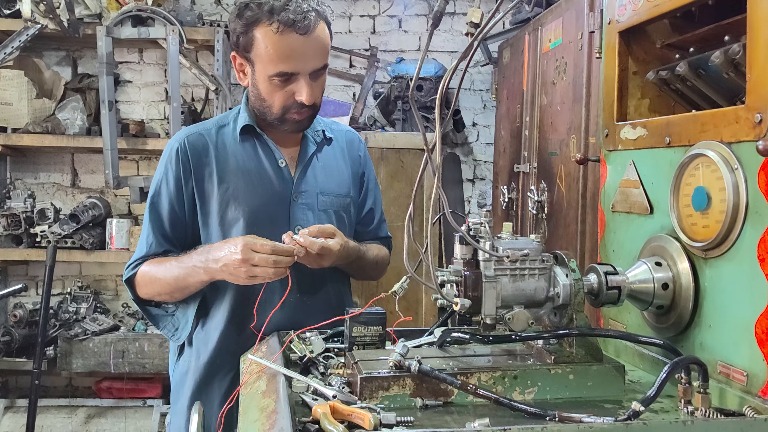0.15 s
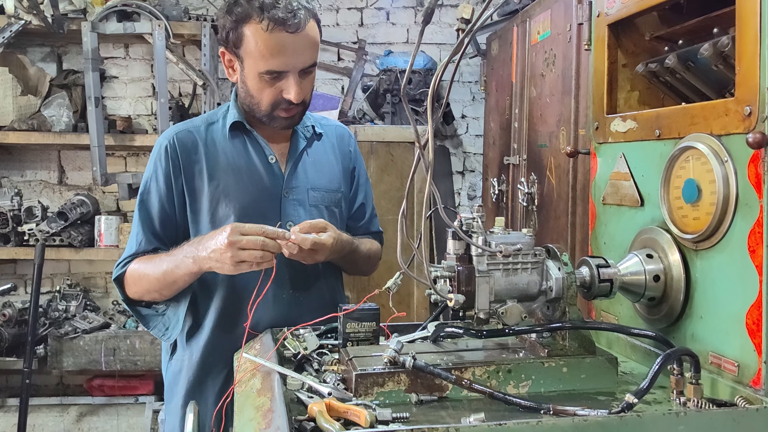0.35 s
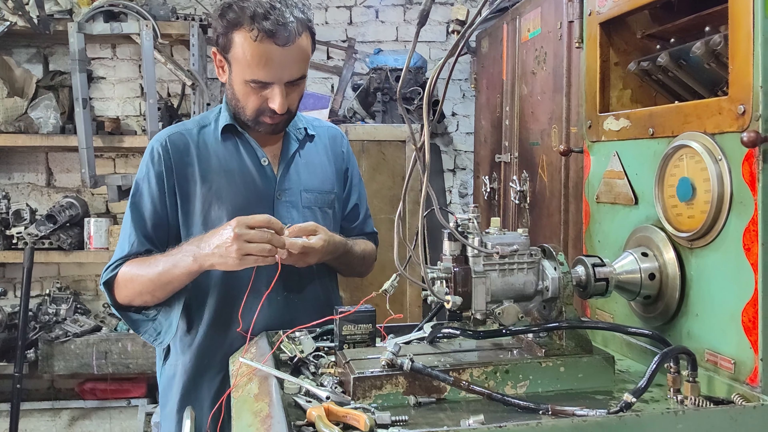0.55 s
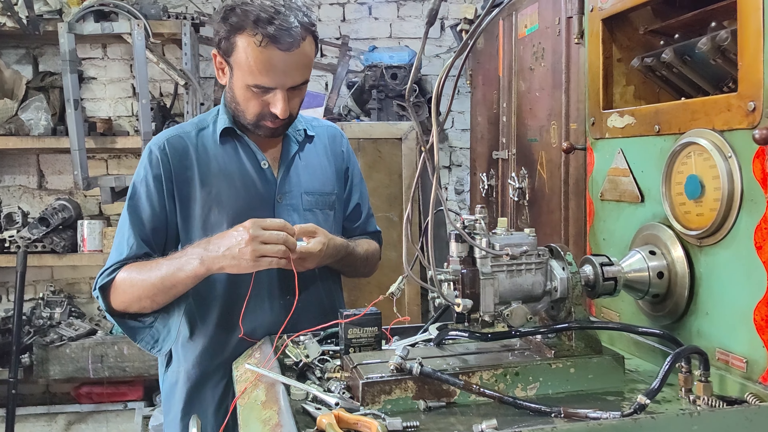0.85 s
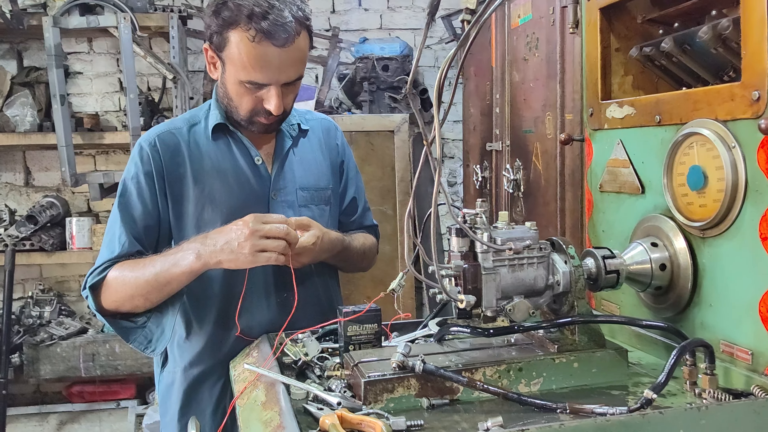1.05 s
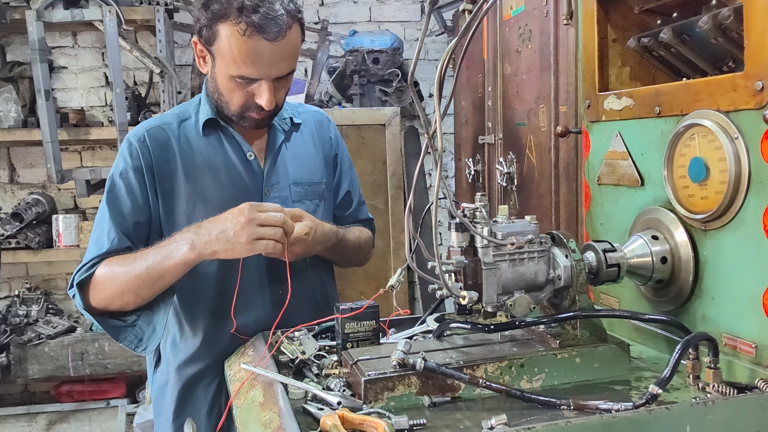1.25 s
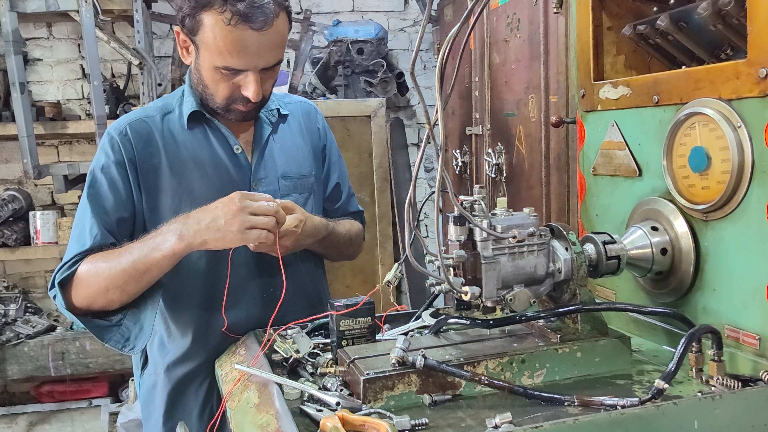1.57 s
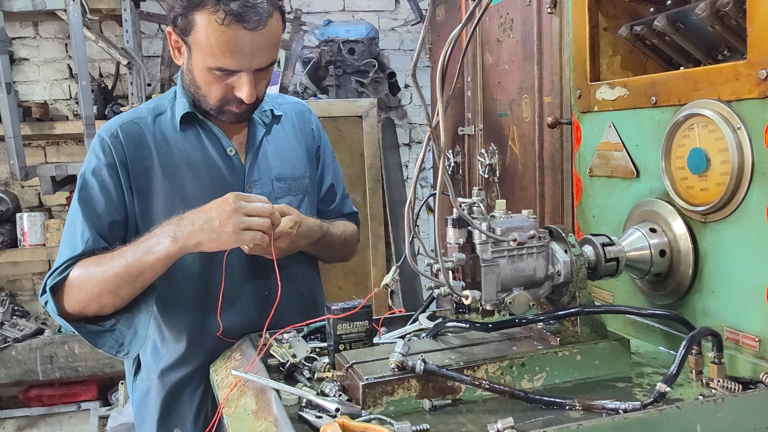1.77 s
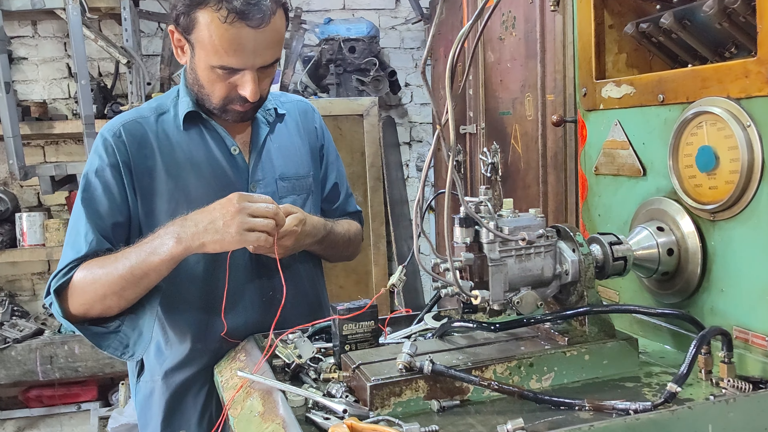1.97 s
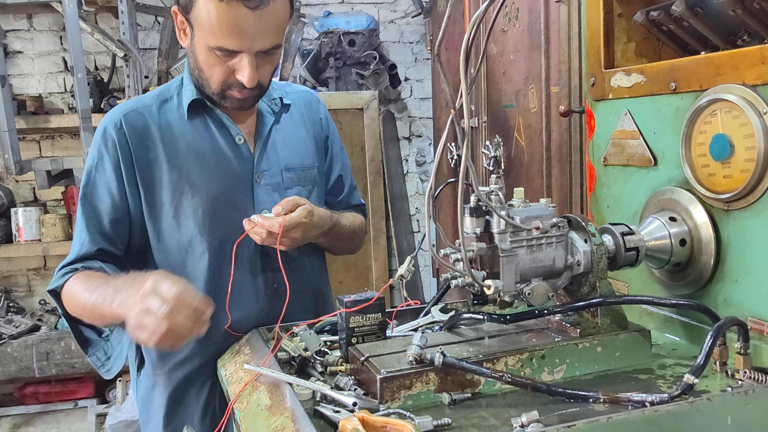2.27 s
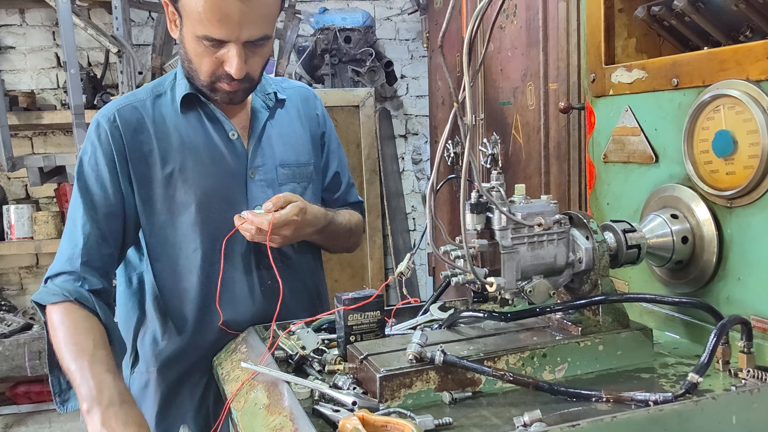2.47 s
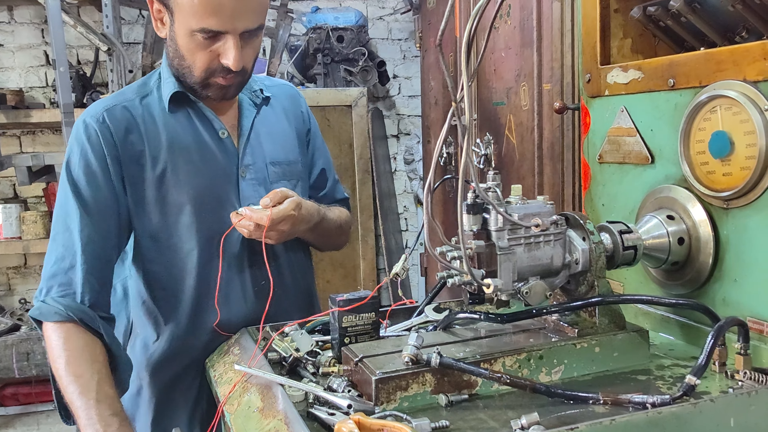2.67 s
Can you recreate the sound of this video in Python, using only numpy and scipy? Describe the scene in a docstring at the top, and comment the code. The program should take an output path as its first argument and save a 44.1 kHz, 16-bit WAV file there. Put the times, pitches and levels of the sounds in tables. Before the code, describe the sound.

A motor-driven test bench runs a fuel injection pump, clattering steadily over a low electric hum

```python
"""In a small workshop, a motor-driven test bench turns a diesel injection pump at a steady speed.
The pump clatters through its metal body (uneven knocks and noise into resonances) and chuffs once a turn.
Wavering sines make the gear lines, the motor hum and the frame's drone on multiples of the shaft rate.
A steel part rings now and then and the frame booms dully; both are short swells of wandering tones.
On the left, a thin noise hiss pulses with the shaft; a broader hiss dies away early."""
import sys
import numpy as np
from scipy import signal
from scipy.fft import rfft, irfft, next_fast_len
from scipy.io import wavfile
from scipy.ndimage import uniform_filter1d, map_coordinates

SR = 44100
rng = np.random.default_rng(int(sys.argv[2]) if len(sys.argv) > 2 else 0)


def waveform_to_disk(signal):
    """Save audio, clipped to [-1, 1], as 16-bit WAV at the path in sys.argv[1]."""
    frames = np.transpose(np.atleast_2d(signal))
    scaled = np.clip(frames, -1, 1) * 32767
    samples = np.round(scaled).astype(np.int16)
    wavfile.write(sys.argv[1], SR, samples)


N = 124362

SHAFT_HZ = 12.302
SWELL_TURN = 0.48


def amp(db):
    """Decibels to gain."""
    return 10 ** (np.asarray(db) / 20)


def unit(x):
    """Scale to rms 1."""
    return x / np.sqrt(np.mean(x ** 2) + 1e-20)


def clock():
    """The time of every sample [s]."""
    return np.arange(N) / SR


def along(points, hz):
    """Interpolate (Hz, value) points on a log axis."""
    f, v = np.transpose(points)
    return np.interp(np.log(hz + 1), np.log(f + 1), v)


def curve(rows):
    """(s, value) points joined by lines."""
    return np.interp(clock(), *np.transpose(rows))


def wobble(rate_hz):
    """A smooth random curve, rate_hz knots a second."""
    knots = rng.standard_normal(int(N * rate_hz / SR) + 4)
    return map_coordinates(knots, [clock() * rate_hz])


def filtered(x, response):
    """x times a response of frequency, zero-padded."""
    size = next_fast_len(N + SR // 2)
    hz = np.fft.rfftfreq(size, 1 / SR)
    return irfft(rfft(x, size) * response(hz), size)[..., :N]


def coloured(x, spectrum):
    """x shaped by the given spectrum, at rms 1."""
    return unit(filtered(x, lambda hz: amp(along(spectrum, hz))))


# left-right correlation: (frequency [Hz], correlation [0-1])
CORRELATION = [(30, 0.64), (70, 1), (150, 1), (400, 0.96), (800, 0.93), (1300, 0.5), (2500, 0.29),
               (5000, 0.042)]


def spread(pair):
    """Two signals become left and right at rms 1: alike in the bass, apart in the treble."""
    def mid_side_gains(hz):
        angle = np.arccos(np.clip(along(CORRELATION, hz), -1, 1)) / 2
        return np.array([np.cos(angle), np.sin(angle)])
    mid, side = filtered(pair, mid_side_gains)
    return unit(np.array([mid + side, mid - side]))


def noise():
    """Two channels of white noise."""
    return rng.standard_normal((2, N))


def tone(hz, waver_rad, rate_hz=5):
    """A sine of about rms 1 whose phase wanders."""
    start_turn = rng.random()
    return np.sqrt(2) * np.sin(2 * np.pi * (hz * clock() + start_turn) + waver_rad * wobble(rate_hz))


def bump(s, length_s):
    """A soft Gaussian swell around time s."""
    return np.exp(-(2 * (clock() - s) / length_s) ** 2)


def swell(count=1, turn=SWELL_TURN):
    """A cosine of count cycles a turn, peaking at the given place in the turn."""
    return np.cos(2 * np.pi * count * (SHAFT_HZ * clock() - turn))


PATCHY_DB = 3


def patchy(x):
    """Neighbouring bands swell and sink by chance; rms 1."""
    z = signal.stft(x, nperseg=512)[2]
    field = rng.standard_normal(z.shape[1:])
    field = uniform_filter1d(field, size=3, axis=0)
    field = uniform_filter1d(field, size=5, axis=1)
    return unit(signal.istft(z * amp(PATCHY_DB * unit(field)), nperseg=512)[1][:, :N])


ROOM_T60_S, ROOM_DB = 0.12, 3


def workshop(x):
    """Direct sound plus a short diffuse decaying tail, as middle and side."""
    t = np.arange(SR // 3) / SR
    tail = rng.standard_normal((2, len(t))) * amp(-60 * t / ROOM_T60_S)
    tail /= np.linalg.norm(tail, axis=1, keepdims=True)
    middle, side = signal.fftconvolve(x[None], tail, axes=1)[:, :N]
    return np.array([unit(x + amp(ROOM_DB) * middle), unit(side)])


KNOCK_JITTER_S, KNOCK_SCATTER_DB, KNOCK_PATTERN_DB = .00022, 2.2, 1.3


def knocks(count):
    """The same uneven contacts come round every turn, never quite alike."""
    turns = np.arange(int(N / SR * SHAFT_HZ) + 1)[:, None]
    place = (np.arange(count) + rng.random(count)) / count
    jitter_s = KNOCK_JITTER_S * rng.standard_normal((len(turns), count))
    s = (turns + place) / SHAFT_HZ + jitter_s
    pattern_db = KNOCK_PATTERN_DB * rng.standard_normal(count)
    size = amp(pattern_db + KNOCK_SCATTER_DB * rng.standard_normal(s.shape))
    return np.bincount(np.abs(s * SR).astype(int).ravel(), size.ravel(), N)[:N]


# pump body spectrum, with a faint separate band of hiss near 14-15 kHz: (frequency [Hz], relative density [dB])
BODY_SPECTRUM = [(250, -26), (480, -11.5), (660, -12.5), (780, -3), (880, 0), (990, -4), (1120, 0),
                 (1220, 0.5), (1330, -1), (1570, -1.5), (1710, -2), (1810, -7), (2120, 2), (2270, -5),
                 (2500, -2), (2660, -7), (2980, -8), (3250, -17.5), (3600, -15.5), (3950, -26),
                 (4280, -28.5), (4750, -20), (5500, -29.5), (6500, -35), (7700, -50), (13700, -54),
                 (14700, -51)]
# housing and bench resonances: (frequency [Hz], width [Hz], relative gain [dB])
HOUSING_MODES = [(904, 55, -1), (1055, 48, 2), (1111, 32, 2.5), (1420, 16, 6.5), (1522, 28, 4),
                 (1738, 55, 4), (1905, 32, 1), (2053, 29, 5), (2478, 58, -1)]
# drive noise level, used about its mean: (time [s], level [dB])
DRIVE_LOAD = [(0.2, -34), (0.45, -36.5), (0.56, -36), (0.69, -36.5), (0.77, -36.5), (1.1, -37.5),
              (1.4, -36), (1.9, -36.5), (2.3, -35.5), (2.59, -35), (2.77, -36.5)]
CLATTER_DB, HOUSING_DB, WHIRR_DB = -40, -41.5, -44
HOUSING_WAVER_DB, CLATTER_SWELL_DB = 5, -0.25


def drive():
    """Gear and tappet knocks and bearing whirr excite the pump body; each resonance swells in its own way."""
    blows = workshop(knocks(count=24))
    push = unit(blows) + noise()
    ringing = 0
    for k, (centre_hz, width_hz, db) in enumerate(HOUSING_MODES):
        def resonance(f):
            damping = 1j * f * width_hz
            return (-1) ** k * damping / (centre_hz ** 2 - f * f + damping)
        ringing = ringing + amp(db + HOUSING_WAVER_DB * wobble(28.2)) * filtered(push, resonance)
    parts = ((CLATTER_DB, patchy(blows)), (HOUSING_DB, ringing), (WHIRR_DB, patchy(noise())))
    body = sum(amp(db) * spread(coloured(part, BODY_SPECTRUM)) for db, part in parts)
    load_db = curve(DRIVE_LOAD)
    return amp(load_db - load_db.mean() + CLATTER_SWELL_DB * swell()) * body


# stroke noise spectrum: (frequency [Hz], relative density [dB])
PUFF_SPECTRUM = [(400, -24), (850, 0), (1250, 2), (1650, 3), (2000, -2.5), (2400, -3), (2800, -4),
                 (3100, -11), (3600, -17.5), (4100, -36), (8000, -48.5)]
# harder, scraping strokes: (time [s], length [s], level [dB])
SCRAPE_STROKES = [(.208, 0.038, -34.5), (.603, 0.031, -41.5), (1.509, .02, -41.5), (2.232, .02, -40),
                  (2.316, 0.024, -40), (2.648, 0.046, -34.5), (2.715, 0.026, -40), (2.799, 0.018, -40)]
STROKE_TURN, STROKE_S, STROKE_HZ, STROKE_SCATTER_HZ = .42, .022, 1310, 18
STROKE_DB, STROKE_SCATTER_DB, PUFF_DB = -46.3, 1, -42.5


def strokes():
    """Once a turn a short housing ring sounds inside a puff of noise; some strokes scrape harder."""
    times = (np.arange(int(N / SR * SHAFT_HZ) + 1) + STROKE_TURN) / SHAFT_HZ
    size, detune = rng.standard_normal((2, len(times)))
    beats = [amp(STROKE_SCATTER_DB * z) * bump(s, STROKE_S) for s, z in zip(times, size)]
    pitches_hz = STROKE_HZ + STROKE_SCATTER_HZ * detune

    def ring():
        return sum(beat * np.sin(2 * np.pi * (hz * clock() + rng.random()))
                   for beat, hz in zip(beats, pitches_hz))
    rings = np.array([ring() for _ in range(2)])
    scrapes = sum(amp(db) * bump(s, length_s) for s, length_s, db in SCRAPE_STROKES)
    puff = amp(PUFF_DB) * sum(beats) + scrapes
    return amp(STROKE_DB) * spread(rings) + puff * spread(coloured(patchy(noise()), PUFF_SPECTRUM))


# gear lines: {multiple of shaft rate: level [dB]}
GEAR_LINES = {73: -48.5, 86: -53.5, 89: -52.5, 90: -56, 96: -60.5, 105: -58, 124: -56, 139: -60, 168: -56}
GEAR_WAVER_DB, GEAR_WAVER_RAD = 3, .55


def gears():
    """Gear lines at shaft-rate multiples waver in level and phase."""
    def line(hz):
        level = amp(GEAR_WAVER_DB * wobble(14))
        return level * np.array([tone(hz, GEAR_WAVER_RAD, rate_hz=16) for _ in range(2)])
    return sum(amp(db) * spread(line(k * SHAFT_HZ)) for k, db in GEAR_LINES.items())


# frame drone: {multiple of shaft rate: level [dB]}
FRAME_ORDERS = {4: -56, 5: -39, 6: -52, 7: -59, 9: -60, 11: -63, 14: -52, 16: -48.5, 17: -53, 20: -47.5, 21:
                -51, 22: -58.5, 23: -57, 32: -61.5, 34: -55, 35: -65, 38: -66.5}
# rumble spectrum: (frequency [Hz], relative density [dB])
RUMBLE_SPECTRUM = [(20, -19), (32, -2), (50, -3.5), (80, -1.5), (125, 1.5), (190, -3), (270, -5.5),
                   (310, -9), (360, -4), (425, -11.5), (470, -17), (650, -19.5), (1200, -52), (4000, -100)]
# deep drone, before mean removal and DEEP_SHARE: (time [s], level [dB])
DEEP_LEVEL = [(0.4, -29), (0.68, -36), (0.7, -36), (1.01, -45), (1.17, -31.5), (1.27, -44), (2.16, -38),
              (2.2, -38), (2.23, -36), (2.63, -43), (2.75, -33), (2.8, -51)]
# throb above it, before mean removal and THROB_SHARE: (time [s], level [dB])
THROB_LEVEL = [(0.2, -40), (0.35, -44), (0.41, -41.5), (0.68, -40), (.93, -42), (1.15, -40.5), (1.8, -41.5),
               (2.11, -37), (2.14, -42), (2.18, -40), (2.3, -36), (2.4, -44.5), (2.52, -42.5), (2.8, -39.5)]
DEEP_SHARE, THROB_SHARE = 0.4, 0.57
MAINS_HUM_HZ, HUM_DB, HUM_WAVER_DB = 99.8, -35, 0.4
MOTOR_HZ, MOTOR_DB = 44.6, -49.5
DRONE_WAVER_DB, DRONE_WAVER_RAD, DRONE_SIDE_DB = 3, 0.21, -23
RUMBLE_DB, RUMBLE_WAVER_DB = -41, 1.7
THROB_TURN, THROB_SWELL_DB = 0.095, 1.5


def drone():
    """Motor hum, the frame's shaft orders and the rumble between them, throbbing twice a turn."""
    def swing(rows, share):
        level_db = curve(rows)
        return share * (level_db - level_db.mean())
    deep_db, throb_db = swing(DEEP_LEVEL, DEEP_SHARE), swing(THROB_LEVEL, THROB_SHARE)

    def order(k, db):
        hz = k * SHAFT_HZ
        swing_db = deep_db if hz < 100 else throb_db if hz < 500 else 0
        return amp(db + swing_db + DRONE_WAVER_DB * wobble(5.01)) * tone(hz, DRONE_WAVER_RAD)
    hum = amp(HUM_DB + HUM_WAVER_DB * wobble(7.45)) * tone(MAINS_HUM_HZ, 0.063)
    hum = hum + amp(MOTOR_DB + deep_db) * tone(MOTOR_HZ, .2)
    frame = sum(order(k, db) for k, db in FRAME_ORDERS.items())
    # quadrature copy, opposite in the two channels
    side = amp(DRONE_SIDE_DB) * signal.hilbert(hum + frame).imag * wobble(6.12)
    twice_a_turn_db = THROB_SWELL_DB * swell(count=2, turn=THROB_TURN)
    rumble_db = RUMBLE_DB + throb_db + twice_a_turn_db + RUMBLE_WAVER_DB * wobble(40.17)
    rumble = amp(rumble_db) * spread(coloured(noise(), RUMBLE_SPECTRUM))
    return hum + frame + np.array([side, -side]) + rumble


# ringing bursts: (start [s], length [s], pitch [Hz], level [dB])
RING_BURSTS = [(0.214, 0.025, 2560, -52), (0.605, 0.035, 2540, -40.5), (.68, 0.032, 2510, -39.5),
               (1.162, 0.019, 2524, -44), (1.409, 0.039, 2486, -44), (1.916, 0.033, 2545, -45.5),
               (1.996, 0.031, 2545, -48), (2.074, 0.072, 2557, -38), (2.205, 0.15, 2548, -37),
               (2.64, .03, 2488, -41.5), (2.692, 0.03, 2506, -41.5)]
RING_RISE_S, RING_FALL_S, RING_IDLE_DB = 0.02, 0.016, -59
RING_WANDER_RAD, RING_FLUTTER_DB = .7, 1.5
RASP_HZ, RASP_WIDTH_HZ, RASP_DB = 2510, 55, -7.5


def steel_ring():
    """A lightly rubbed steel part sings in short, unsteady bursts, with a rasp around its tone."""
    t = clock()
    level, pitch_points = amp(RING_IDLE_DB), []
    for s, length_s, hz, db in RING_BURSTS:
        rise = np.clip((t - s) / RING_RISE_S, 0, 1)
        fall = np.exp(-np.maximum(t - s - length_s, 0) / RING_FALL_S)
        level = level + amp(db) * rise * fall
        pitch_points += [(s, hz), (s + length_s, hz)]
    phase = 2 * np.pi * np.cumsum(curve(pitch_points)) / SR

    def song():
        flutter = amp(RING_FLUTTER_DB * wobble(64))
        wander = RING_WANDER_RAD * (wobble(30.09) + wobble(110) / 2)
        return flutter * np.sin(phase + wander)
    songs = unit(np.array([song() for _ in range(2)]))
    rasp = filtered(noise(), lambda hz: 1 / (1 + ((hz - RASP_HZ) / RASP_WIDTH_HZ) ** 4))
    return level * spread(songs + amp(RASP_DB) * unit(rasp))


# frame booms: (time [s], pitch [Hz], level [dB])
FRAME_THUDS = [(.219, 218.8, -41), (.909, 205, -37), (1.033, 205, -37), (1.558, 250.6, -42),
               (2.279, 249, -34), (2.448, 255, -35), (2.455, 180, -36.5), (2.577, 259.9, -37.5)]
THUD_S, THUD_WAVER_RAD = 0.03, 0.36


def thuds():
    """Now and then the frame gives a dull, short boom, alike on both sides."""
    return sum(amp(db) * bump(s, THUD_S) * tone(hz, THUD_WAVER_RAD, rate_hz=57)
               for s, hz, db in FRAME_THUDS)


# thin hiss spectrum: (frequency [Hz], relative density [dB])
THIN_SPECTRUM = [(2500, -3), (4200, -6), (4720, 0), (5100, -4), (5600, -2.5), (7700, -5), (8300, 0),
                 (8850, 8.5), (9700, -4.5), (12900, -12.5), (13500, -26), (15200, -27)]
# thin hiss drift about HISS_DB: (time [s], level [dB])
THIN_DRIFT = [(.8, -3), (.87, -2.5), (.92, 3.5), (.98, 1.5), (1.17, 1.5), (1.26, -2), (1.33, 0.5),
              (1.6, -1), (1.92, 1.5), (2.12, -2.5), (2.28, 2.5), (2.55, -0.5), (2.8, 0.5)]
# broad hiss spectrum: (frequency [Hz], relative density [dB])
BROAD_SPECTRUM = [(2500, 3.5), (4200, -2), (4800, 5.5), (5800, -0.5), (7500, -1), (8500, 5), (9800, -6.5),
                  (13000, -8), (13800, -16), (15200, -15)]
# broad hiss: (time [s], level [dB])
BROAD_LEVEL = [(.17, -41), (.2, -45), (.28, -44.5), (.34, -49.5), (.44, -46.5), (.56, -48), (.6, -39.5),
               (.68, -48), (.76, -50.5), (.9, -63), (1.1, -81)]
HISS_DB, HISS_SWELL_DB, HISS_WAVER_DB, HISS_RIGHT_DB = -55, 1.8, 1.24, -28
SURGE_TURN, SURGE_DB = 2.5, 0.7


def hiss():
    """Thin noise pulses each turn and surges every third; broader noise dies away early. Both lie left."""
    surge = np.cos(2 * np.pi * (SHAFT_HZ * clock() - SURGE_TURN) / 3)
    pulse_db = HISS_SWELL_DB * swell() + SURGE_DB * surge
    thin_db = HISS_DB + curve(THIN_DRIFT) + pulse_db + HISS_WAVER_DB * wobble(60)
    thin = amp(thin_db) * coloured(noise(), THIN_SPECTRUM)
    broad_db = curve(BROAD_LEVEL) + 1.2 * swell() + 0.97 * wobble(300)
    broad = amp(broad_db) * coloured(noise(), BROAD_SPECTRUM)
    return (thin + broad) * amp([[0], [HISS_RIGHT_DB]])


def scene():
    """The whole bench."""
    return drive() + strokes() + gears() + drone() + steel_ring() + thuds() + hiss()


START_S, FADE_S, TOP_HZ = .149, .048, 15250
BASS_START_S, BASS_FADE_S, BASS_THIN_DB, BASS_EDGE_HZ = 0.37, 0.03, -15, 118


def record(dry):
    """After silence the sound fades in, its full deep bass a moment later; nothing lies above TOP_HZ."""
    def ramp(start_s, length_s):
        return np.clip((clock() - start_s) / length_s, 0, 1)
    bass = filtered(dry, lambda hz: 1 / (1 + (hz / BASS_EDGE_HZ) ** 6))
    thinned = dry - bass * (1 - amp(BASS_THIN_DB)) * (1 - ramp(BASS_START_S, BASS_FADE_S))
    return filtered(thinned * ramp(START_S, FADE_S) ** 1.01, lambda hz: hz < TOP_HZ)


dry = scene()
out = record(dry)
waveform_to_disk(out)
```